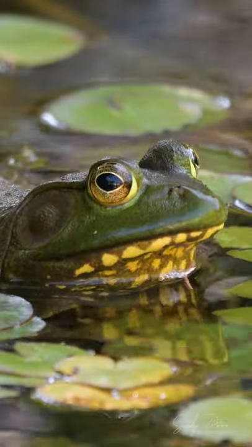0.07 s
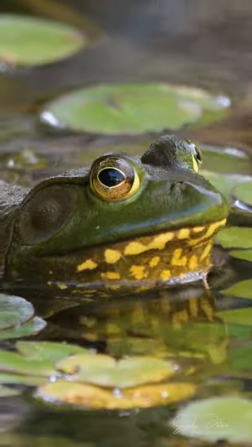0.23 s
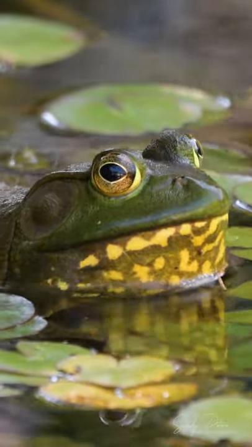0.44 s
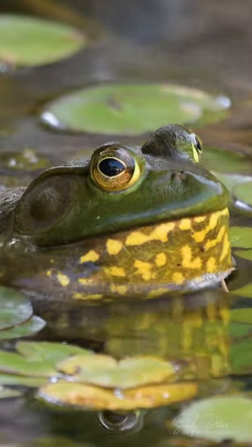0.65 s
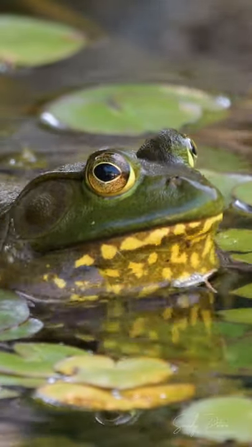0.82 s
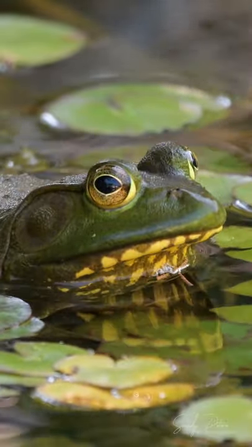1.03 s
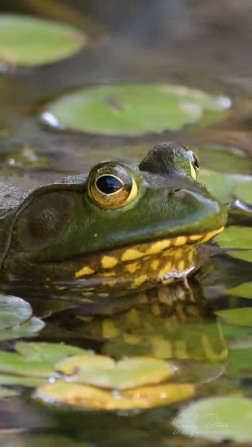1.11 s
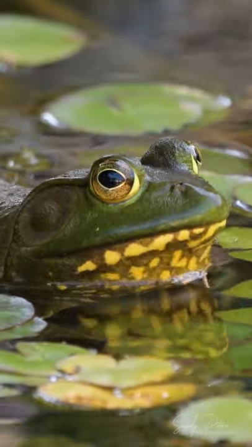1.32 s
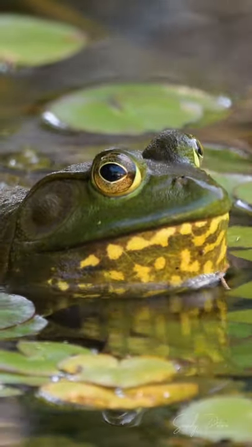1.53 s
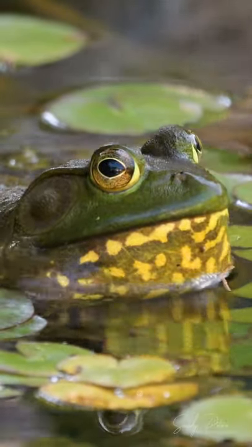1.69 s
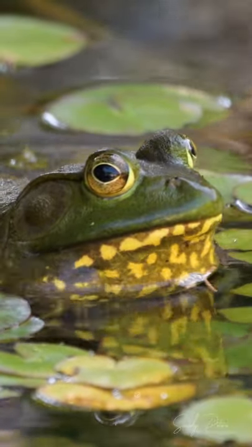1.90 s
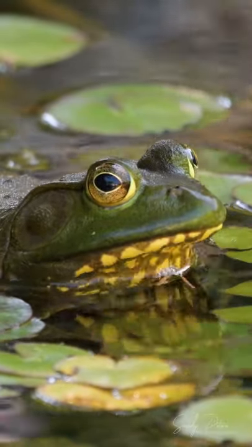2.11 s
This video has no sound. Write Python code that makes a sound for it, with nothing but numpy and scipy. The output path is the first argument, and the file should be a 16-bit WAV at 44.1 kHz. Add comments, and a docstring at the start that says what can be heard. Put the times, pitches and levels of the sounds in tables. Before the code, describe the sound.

A bullfrog gives two low, throbbing bellows over faint trickling pond water.

```python
"""A bullfrog bellows twice from a lily pond, each call swelling in three or four throbs.
Its vocal folds slap about 113 times a second, rattling between beats at full effort;
the vocal sac hums below, the eardrums ring above.
Water trickles and plops around it, over outdoor hiss and a faint low drone."""
import sys
import numpy as np
from scipy import signal
from scipy.fft import rfft, irfft
from scipy.io import wavfile
from scipy.ndimage import uniform_filter1d

SR = 44100
rng = np.random.default_rng(int(sys.argv[2]) if len(sys.argv) > 2 else 0)


def int16_out(signal):
    """Quantize to a 16-bit WAV file."""
    q = np.round(np.clip(np.atleast_2d(signal).T, -1, 1) * 32767)
    wavfile.write(sys.argv[1], SR, q.astype(np.int16))


N = 94815

# spectrum of wash and splashes (frequency [Hz], relative level [dB])
WATER_SPECTRUM = [(20, -28), (40, -11), (65, -6.5), (170, -4.5), (300, -4.5), (600, -4), (900, -1.5),
                  (1300, -1), (1700, -4.5), (2400, -2.5), (3700, -3), (4700, -7), (6700, -7.5), (8500, -14),
                  (11500, -16.5), (14000, -27), (16000, -34)]


def amp(db):
    """Decibels to gain."""
    return 10 ** (np.asarray(db) / 20)


def unit(x):
    """Scale to rms 1."""
    return x / np.sqrt(np.mean(x ** 2) + 1e-20)


def read(spectrum, hz):
    """Interpolate a spectrum table over log frequency."""
    f, value = np.transpose(spectrum)
    return np.interp(np.log(hz + 1), np.log(f), value)


def follow(table, t):
    """Interpolate each column over time."""
    times, *columns = np.transpose(table)
    return [np.interp(t, times, column) for column in columns]


def pan(db):
    """Stereo gains for a left-minus-right level."""
    return amp([[db / 2], [-db / 2]])


def add(mix, start_s, sound):
    """Mix a sound in at start_s."""
    part = mix[:, max(round(start_s * SR), 0):][:, :sound.shape[-1]]
    part += sound[..., :part.shape[1]]


def colour(x, spectrum, size=8192):
    """Minimum-phase filter with the given spectrum."""
    log_gain = np.log(amp(read(spectrum, abs(np.fft.fftfreq(size, 1 / SR)))))
    response = np.fft.ifft(np.exp(np.conj(signal.hilbert(log_gain)))).real[:size // 2]
    return signal.fftconvolve(x, response)[:len(x)]


def stereo_noise(spectrum, samples):
    """Independent coloured noise per channel, rms 1."""
    return np.array([unit(colour(white, spectrum)) for white in rng.standard_normal((2, samples))])


def clicks(t, times, sizes):
    """Impulses, each split between two adjacent samples."""
    at = np.clip((times - t[0]) * SR, 0, len(t) - 2)
    whole, frac = at.astype(int), at % 1
    return np.bincount(whole, sizes * (1 - frac), len(t)) + np.bincount(whole + 1, sizes * frac, len(t))


def drone():
    """Two faint wavering low tones of narrowband noise."""
    # (centre [Hz], half-width [Hz], level [dB])
    bands = [(63.3, 6, -57), (121.8, 7.2, -49)]
    f = np.fft.rfftfreq(N, 1 / SR)
    tones = np.zeros(N)
    for hz, half_width_hz, db in bands:
        band = rfft(rng.standard_normal(N)) / (1 + ((f - hz) / half_width_hz) ** 2)
        tones += amp(db) * unit(irfft(band, N))
    return tones * pan(1.5)


def wash(level_db=-33, patchy_db=2.5, flicker_db=0.9, size=512):
    """Hiss of moving water and open air, patchy in time and pitch."""
    # (frequency [Hz], left-right correlation [0-1])
    correlation = [(60, 0.6), (300, 0.67), (1200, 0.91), (2500, 0.75), (5000, 0.38), (12000, 0)]
    # (frequency [Hz], left minus right [dB])
    balance = [(100, 3), (600, 1.5), (1500, 1.5), (2600, -3), (3900, 3), (5000, -2), (6400, -8), (9000, -2),
               (11000, 3), (15000, 3)]
    hop = size // 4
    frames, hz = N // hop + 6, np.fft.rfftfreq(size, 1 / SR)
    shape = (2, frames, len(hz))
    left, independent = rng.standard_normal(shape) + 1j * rng.standard_normal(shape)
    patches = uniform_filter1d(rng.standard_normal(left.shape), size=6, axis=0)
    patches = unit(uniform_filter1d(patches, size=9, axis=1))
    flicker = unit(uniform_filter1d(rng.standard_normal(frames), size=4))[:, None]
    shared = np.clip(read(correlation, hz), -1, 1)
    right = shared * left + np.sqrt(1 - shared ** 2) * independent
    side = amp(read(balance, hz) / 2)
    spectra = np.array([left * side, right / side]) * amp(patchy_db * patches + flicker_db * flicker)
    noise = signal.istft(spectra.transpose(0, 2, 1), nperseg=size, noverlap=size - hop)[1][:, :N]
    gain = amp(read(WATER_SPECTRUM, np.fft.rfftfreq(N, 1 / SR)))
    return amp(level_db) * unit(irfft(rfft(noise) * gain, N))


def trickle(level_db=-37, drops_per_s=1300, spread_db=5.5, decay_cycles=6.8, pitches=40):
    """Countless small drops, each ringing a few cycles, scattered left and right."""
    # (frequency [Hz], relative level [dB])
    spectrum = [(900, -17), (1400, 1), (2500, 1.5), (4000, 2.5), (6500, 2), (8500, -3), (11500, -10),
                (15000, -23)]
    out, t = np.zeros((2, N)), np.arange(SR // 30) / SR
    for hz in np.geomspace(1000, 14500, pitches):
        sizes = amp(spread_db * np.minimum(rng.exponential(1, N), 4))
        hits = sizes * (rng.random(N) < drops_per_s / pitches / SR)
        pan_rad = rng.uniform(0, np.pi / 2, N)
        drop = np.sin(2 * np.pi * hz * t) * np.exp(-hz * t / decay_cycles) * (1 - np.exp(-hz * t))
        drop *= amp(read(spectrum, hz)) / np.linalg.norm(drop)
        left, right = (signal.oaconvolve(hits * g, drop)[:N] for g in (np.cos(pan_rad), np.sin(pan_rad)))
        out += [left, np.roll(right, rng.integers(-6, 7))]
    return amp(level_db) * unit(out)


def droplets(decay_s=0.0031):
    """Tiny droplets burst with a bright tick."""
    # (time [s], level [dB])
    bursts = [(0.063, -23.5), (.081, -26), (0.151, -21.5), (0.985, -23.5), (1.04, -38), (1.279, -31),
              (1.521, -19.5), (1.84, -21.5)]
    # (frequency [Hz], relative level [dB])
    spectrum = [(1000, -22), (3500, -3), (6500, 7), (11500, -8), (16000, -27)]
    out, t = np.zeros((2, N)), np.arange(SR // 20) / SR
    for start_s, db in bursts:
        add(out, start_s, amp(db) * np.exp(-t / decay_s) * stereo_noise(spectrum, len(t)))
    return out


def plops(rise_s=0.0012, decay_s=0.0035, glide_per_s=5, splash_gain=0.3):
    """Bubbles ring briefly with rising pitch and a little splash."""
    # (time [s], level [dB], starting pitch [Hz])
    bubbles = [(0.957, -28, 1190), (1.000, -22, 1330), (1.006, -27, 1087), (1.244, -34, 1190),
               (1.859, -25, 810), (1.988, -24.5, 828), (2.011, -28, 1256), (2.020, -22, 1360),
               (2.052, -22, 1534), (2.054, -30, 720), (2.067, -23.5, 1560), (2.088, -20.5, 773),
               (2.106, -26.5, 854), (2.124, -27.5, 2310)]
    out, t = np.zeros((2, N)), np.arange(SR // 20) / SR
    envelope = np.minimum(t / rise_s, 1) * np.exp(-np.maximum(t - rise_s, 0) / decay_s)
    for start_s, db, hz in bubbles:
        bubble = np.sin(2 * np.pi * hz * (t + glide_per_s * t ** 2 / 2))
        splash = splash_gain * stereo_noise(WATER_SPECTRUM, len(t))
        add(out, start_s, amp(db) * envelope * (bubble + splash))
    return out


def banks(x, level_db=-5, t60_s=0.21, delay_s=0.004, low_cut_hz=700):
    """Short, thin scatter from the banks, different in each ear."""
    t = np.arange(SR // 2) / SR
    tail = rng.standard_normal((2, len(t))) * 1000 ** (-t / t60_s) * (t > delay_s)
    tail = signal.sosfilt(signal.butter(2, low_cut_hz, "high", fs=SR, output="sos"), tail)
    tail /= np.linalg.norm(tail[0])
    return amp(level_db) * signal.fftconvolve(x.mean(0)[None], tail, axes=1)[:, :N]


def vocal_sac(cycles, second_db, third_db):
    """The sac hums at harmonics 2 and 3 of the fold rate."""
    second = amp(second_db - 2) * np.cos(2 * np.pi * 2 * cycles)
    third = amp(third_db + 1) * np.cos(2 * np.pi * 3 * cycles)
    return np.sqrt(2) * (second + third) * signal.windows.tukey(len(cycles), 0.05)


def vocal_folds(t, fold_hz, cycles, rasp_db):
    """One slap per cycle; effort makes the slaps ragged and adds a rattle between them."""
    # (place in cycle [0-1], strength [gain], timing scatter [s])
    after_slaps = [(.33, 0.75, 0.000475), (.66, 0.54, 0.00069)]
    rattle_from_db, rattle_full_db = -40, -37
    jitter_s, spread_db, flutter_hz, flutter_depth = 0.00012, 2, 43.53, 0.47
    beats = np.flatnonzero(np.diff(np.floor(cycles)))
    effort = np.clip((rasp_db[beats] - rattle_from_db) / (rattle_full_db - rattle_from_db), 0, 1)
    flutter = 1 + flutter_depth * effort * np.sin(2 * np.pi * flutter_hz * t[beats])
    timing, force = rng.standard_normal((2, len(beats)))
    slaps = clicks(t, t[beats] + jitter_s * effort * timing, flutter * amp(spread_db * effort * force))
    rattle = np.zeros(len(t))
    for place, strength, scatter_s in after_slaps:
        timing, force = rng.standard_normal((2, len(beats)))
        times = t[beats] + place / fold_hz[beats] + scatter_s * timing
        rattle += clicks(t, times, strength * effort * (2 - flutter) * amp(spread_db * force))
    return slaps, rattle


def bellow(sac, throbs):
    """One call: the sac hums while fold slaps rasp and ring the eardrums."""
    # one slap in the eardrums (frequency [Hz], relative level [dB])
    ring_spectrum = [(100, -68), (550, -25), (610, -13), (720, -25.5), (940, -29.5), (1030, -11),
                     (1130, -24.5), (1240, -7.5), (1315, 4.5), (1410, -10), (1560, -7), (1800, -17.5),
                     (3000, -56.5), (7000, -76.5)]
    # hard slaps of the rasp (frequency [Hz], relative level [dB])
    rasp_spectrum = [(80, -37), (180, -11), (245, -8), (285, 4.5), (390, 1), (450, -5.5), (510, -25.5),
                     (635, -2), (740, -16), (950, -13.5), (1300, -1), (1570, 5), (1900, 1.5), (2300, -4.5),
                     (2850, -16.5), (3600, -14), (4600, -32.5), (5700, -24), (6800, -22.5), (9000, -42),
                     (15000, -60)]
    t = np.arange(round(sac[0][0] * SR), round(sac[-1][0] * SR)) / SR
    second_hz, second_db, third_db = follow(sac, t)
    ring_db, rasp_db = follow(throbs, t)
    fold_hz = second_hz / 2
    cycles = np.cumsum(fold_hz) / SR
    slaps, rattle = vocal_folds(t, fold_hz, cycles, rasp_db)
    breath = 0.25 * slaps.std() * rng.standard_normal(len(t))
    fade = np.interp(t, [t[0], throbs[0][0], throbs[-1][0], t[-1]], [0, 1, 1, 0]) ** 2
    ring = fade * amp(ring_db - 1) * unit(colour(slaps + 0.66 * rattle + breath, ring_spectrum))
    rasp = fade * amp(rasp_db + 4) * unit(colour(slaps + rattle + breath, rasp_spectrum))
    hum = vocal_sac(cycles, second_db, third_db)
    return t[0], hum * pan(2.34) - ring * pan(-2.4) - rasp * pan(1.5)


def bullfrog():
    """Two throbbing bellows."""
    # per call (time [s], harmonic 2 pitch [Hz], its relative level [dB], harmonic 3 relative level [dB])
    sac_curves = [
        [(0.17, 223.4, -50, -62), (0.204, 222, -38.5, -44), (0.306, 222.5, -30.5, -41),
         (0.392, 229.4, -35, -29), (0.516, 224.9, -24, -33), (0.546, 229.1, -38, -37), (0.594, 231.8, -25, -24),
         (0.722, 229.8, -18, -20.5), (0.81, 219.2, -37, -34), (0.89, 219.7, -43, -75)],
        [(1.26, 222.6, -49, -54), (1.34, 222.5, -34.5, -42), (1.392, 221.4, -38, -37), (1.416, 223.3, -31, -40),
         (1.574, 221.4, -27, -23), (1.614, 225.1, -30, -33.5), (1.646, 226.4, -27.5, -23),
         (1.742, 227.6, -22, -24), (1.864, 221, -33.5, -29.5), (1.96, 222, -45, -79)],
    ]
    # per call (time [s], relative ring level [dB], relative rasp level [dB])
    throb_curves = [
        [(0.19, -40, -41), (0.216, -31, -39.5), (0.3, -22.5, -26.5), (0.332, -27, -41), (0.366, -21, -25.5),
         (0.402, -20.5, -24.5), (0.416, -18.5, -34), (0.442, -25.5, -26.5), (0.516, -13.5, -20),
         (0.546, -26, -31), (0.576, -19.5, -21), (0.698, -16.5, -20), (0.778, -24.5, -34), (0.792, -45, -39),
         (0.84, -55, -59)],
        [(1.3, -40, -58), (1.32, -33, -44), (1.336, -38, -50), (1.346, -32.5, -35.5), (1.442, -17.5, -24.5),
         (1.466, -25, -28), (1.578, -16.5, -20.5), (1.602, -24.5, -30.5), (1.642, -20, -20.5),
         (1.766, -17.5, -25), (1.842, -27.5, -37.5), (1.858, -44, -37), (1.866, -30, -41), (1.884, -40, -36),
         (1.9, -38, -72)],
    ]
    out = np.zeros((2, N))
    for sac, throbs in zip(sac_curves, throb_curves):
        add(out, *bellow(sac, throbs))
    return out


def scene():
    """The frog on its pond; near sounds scatter off the banks."""
    near = bullfrog() + plops() + droplets()
    return near + banks(near) + trickle() + wash() + drone()


def record(dry, cutoff_hz=15780):
    """Two treble notches, then a steep low-pass."""
    # (centre [Hz], twice the -6 dB width [Hz])
    notches = [(7660, 1760), (9610, 1100)]
    f = np.fft.rfftfreq(N, 1 / SR)
    spectrum = rfft(dry)
    for hz, span_hz in notches:
        spectrum *= (f - hz) ** 2 / ((f - hz) ** 2 + (span_hz / 4) ** 2)
    low_pass = signal.firwin(1023, cutoff_hz, window=("kaiser", 9), fs=SR)
    return signal.oaconvolve(irfft(spectrum, N), low_pass[None], "same")


dry = scene()
out = record(dry)
int16_out(out)
```